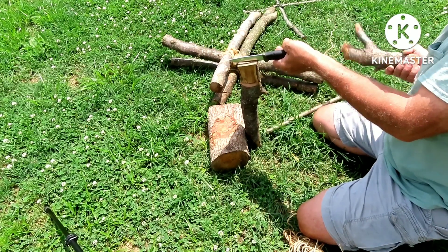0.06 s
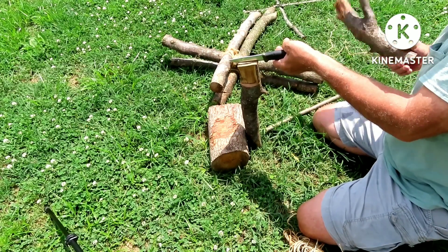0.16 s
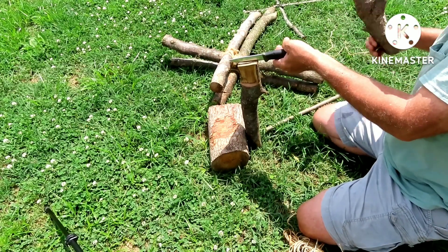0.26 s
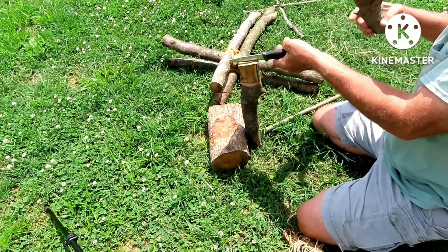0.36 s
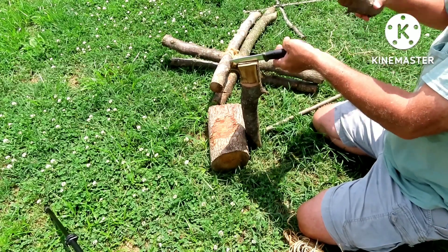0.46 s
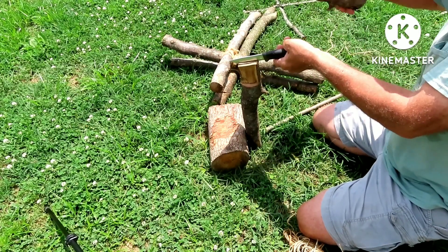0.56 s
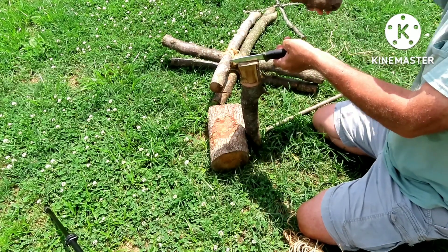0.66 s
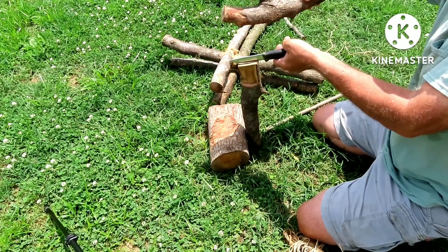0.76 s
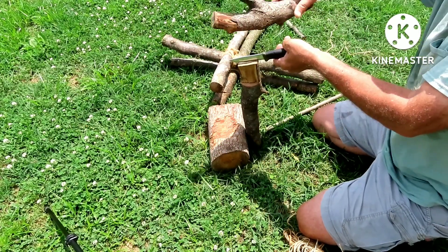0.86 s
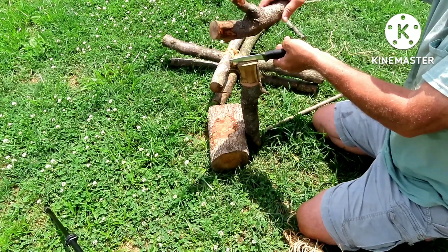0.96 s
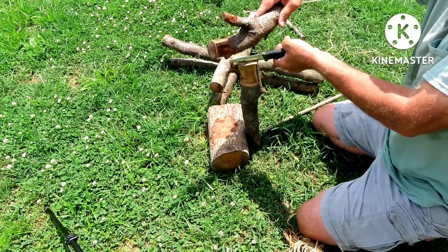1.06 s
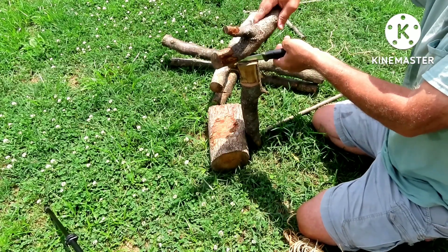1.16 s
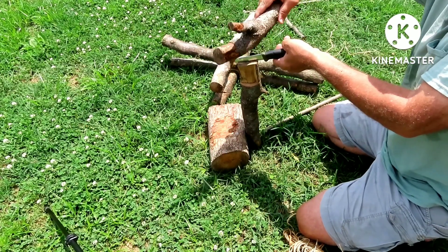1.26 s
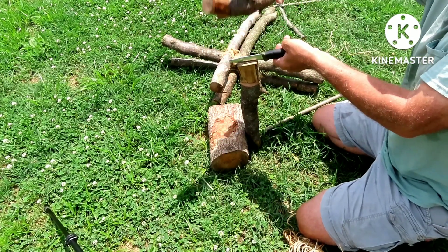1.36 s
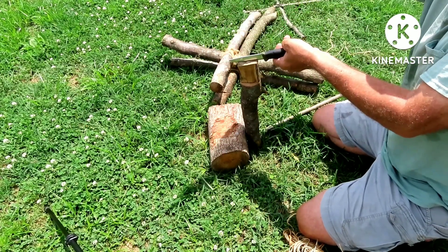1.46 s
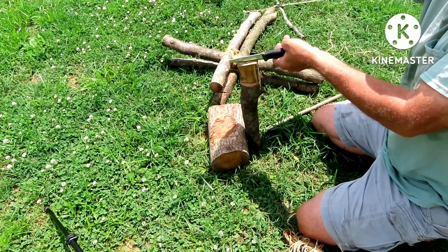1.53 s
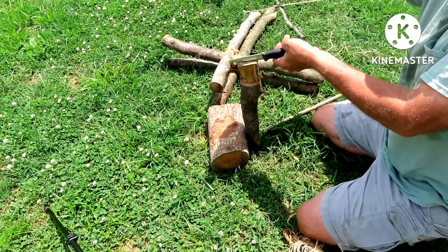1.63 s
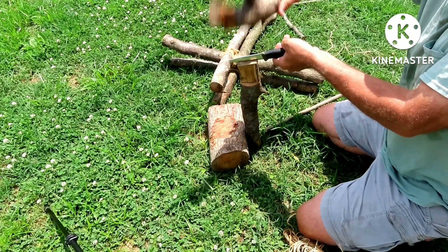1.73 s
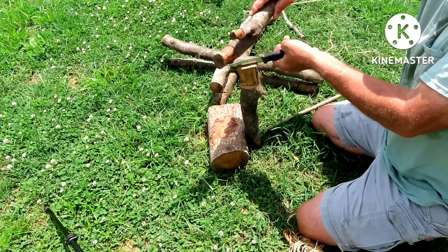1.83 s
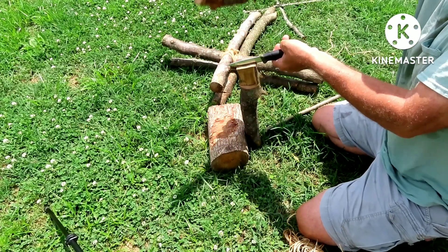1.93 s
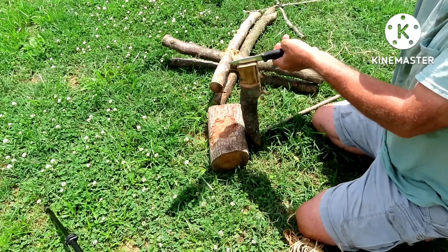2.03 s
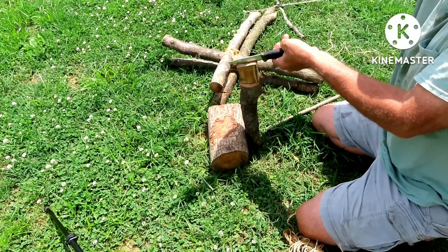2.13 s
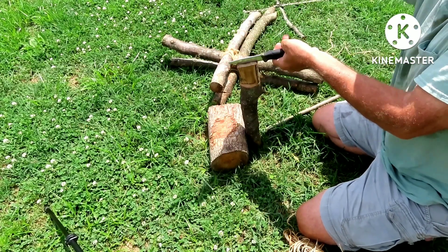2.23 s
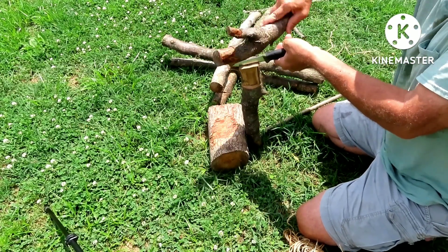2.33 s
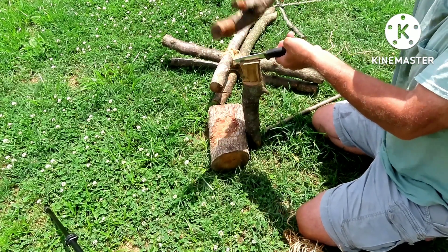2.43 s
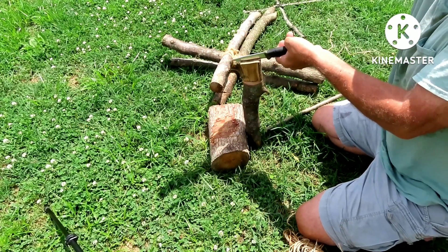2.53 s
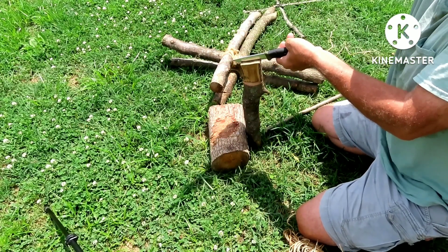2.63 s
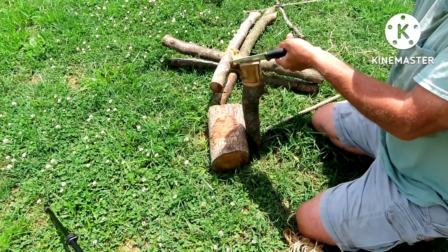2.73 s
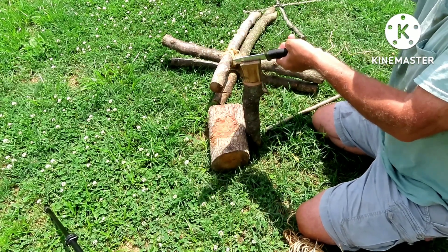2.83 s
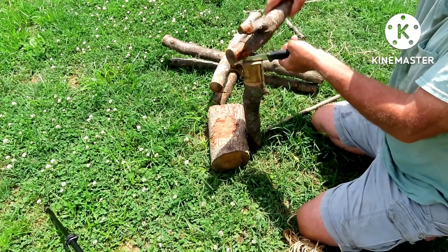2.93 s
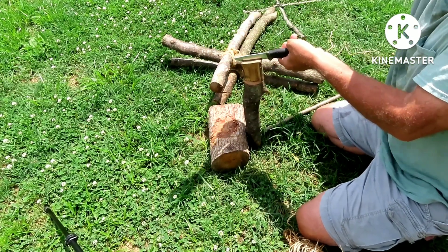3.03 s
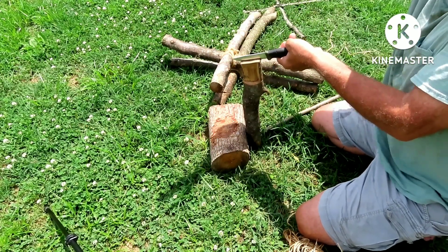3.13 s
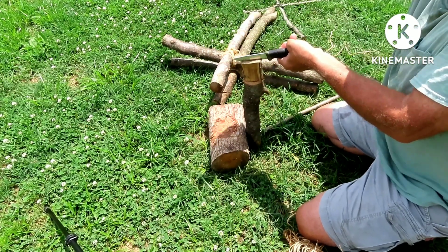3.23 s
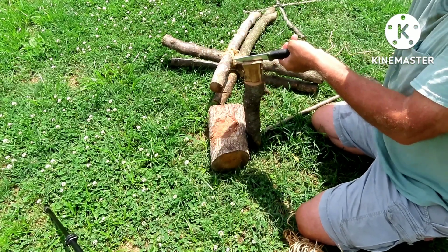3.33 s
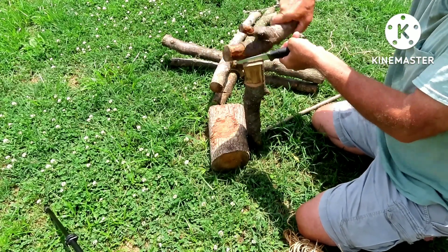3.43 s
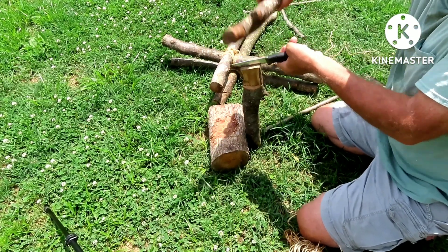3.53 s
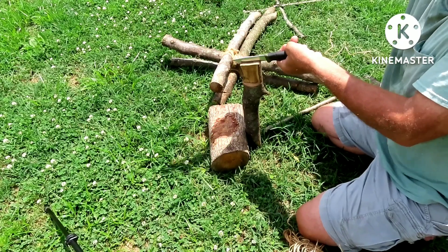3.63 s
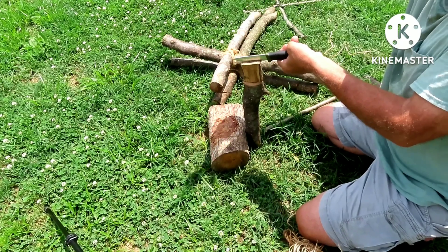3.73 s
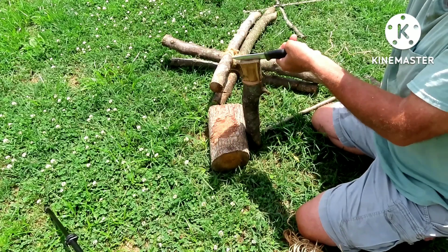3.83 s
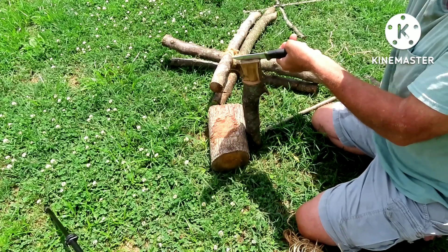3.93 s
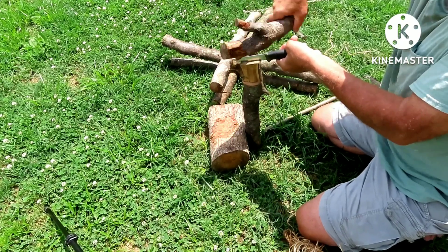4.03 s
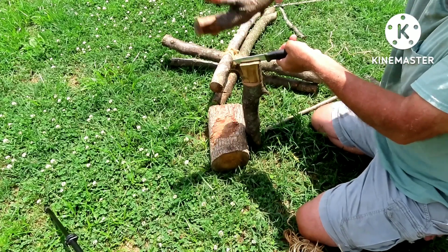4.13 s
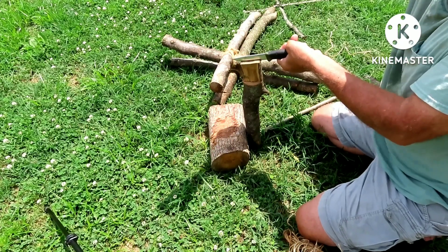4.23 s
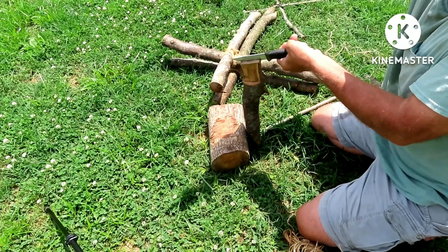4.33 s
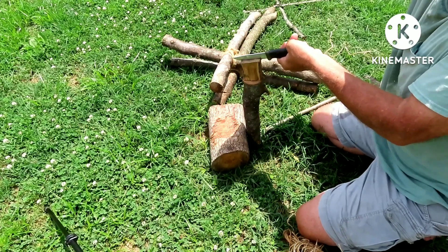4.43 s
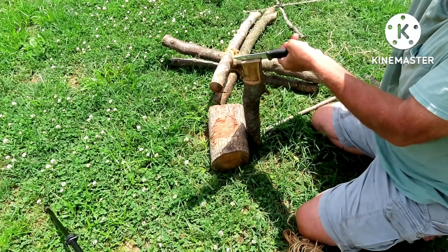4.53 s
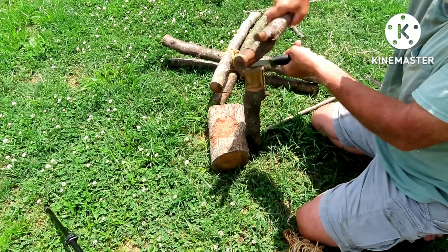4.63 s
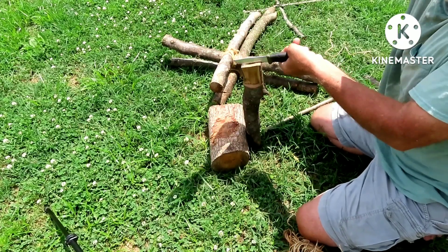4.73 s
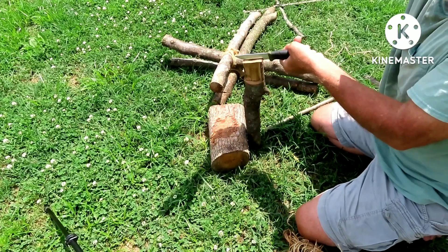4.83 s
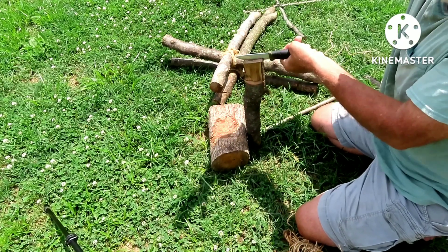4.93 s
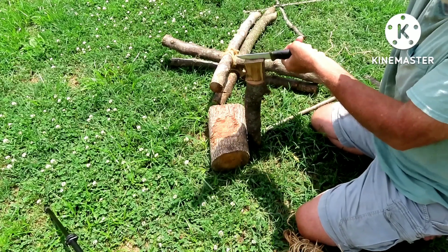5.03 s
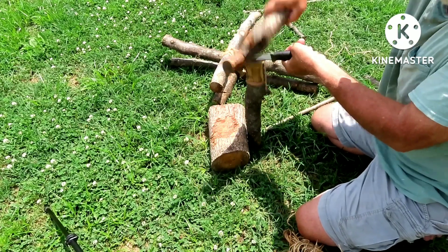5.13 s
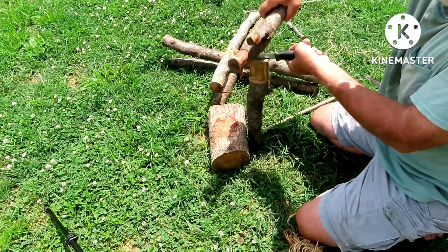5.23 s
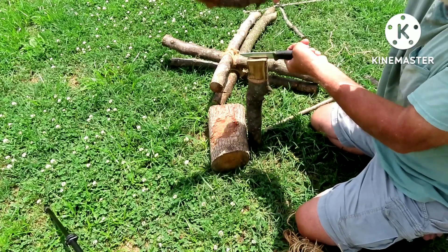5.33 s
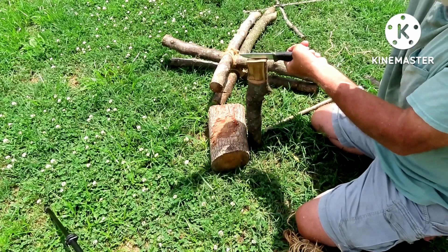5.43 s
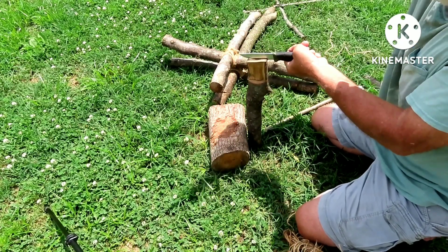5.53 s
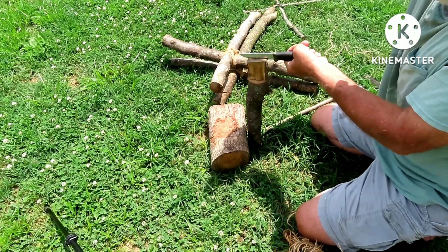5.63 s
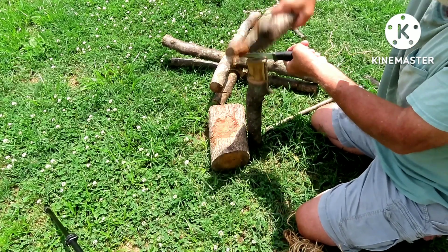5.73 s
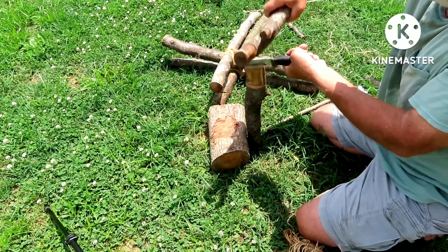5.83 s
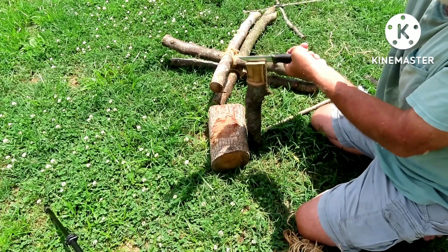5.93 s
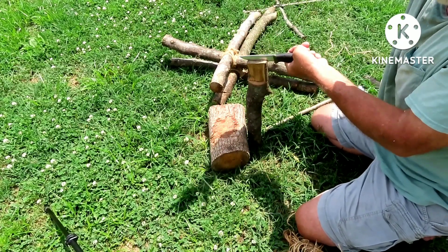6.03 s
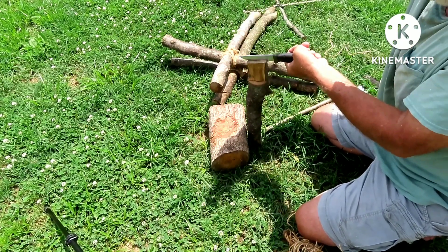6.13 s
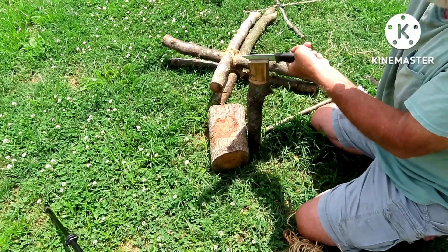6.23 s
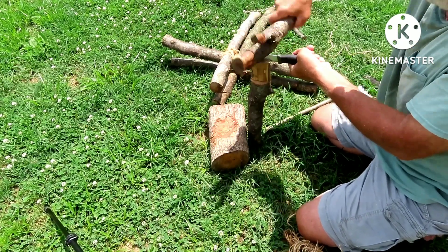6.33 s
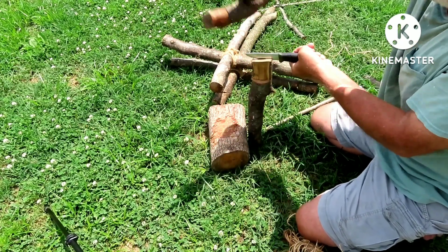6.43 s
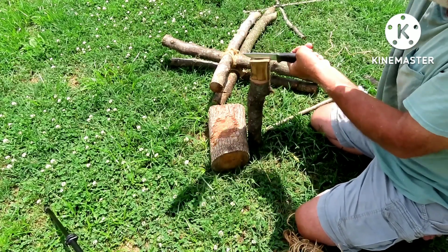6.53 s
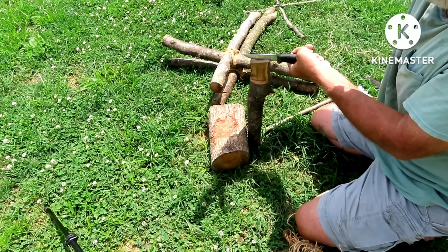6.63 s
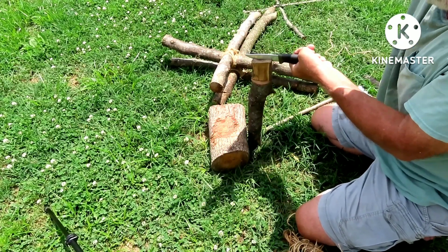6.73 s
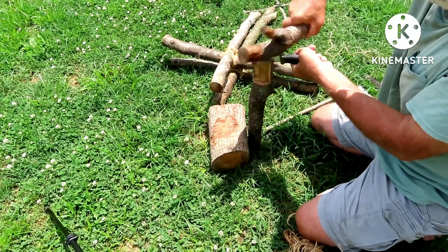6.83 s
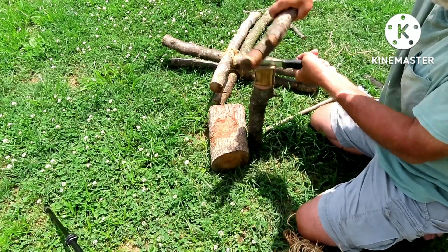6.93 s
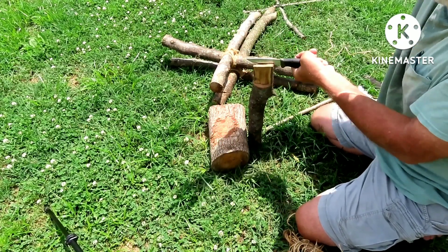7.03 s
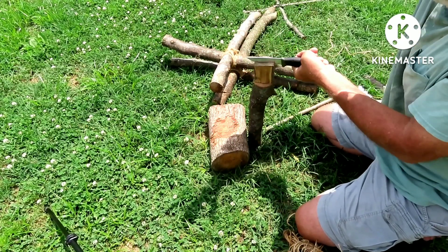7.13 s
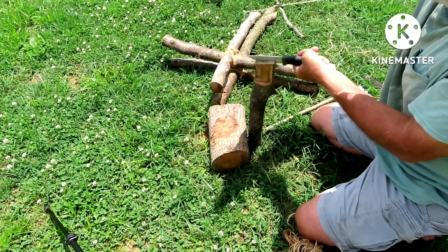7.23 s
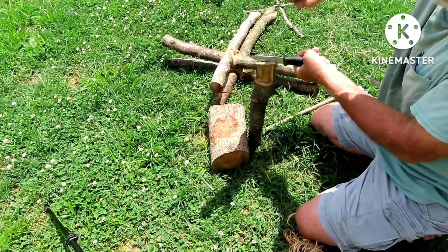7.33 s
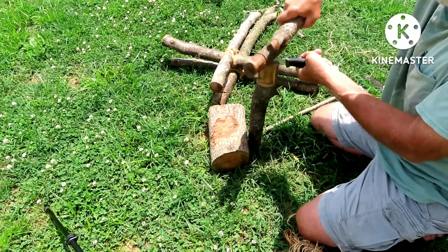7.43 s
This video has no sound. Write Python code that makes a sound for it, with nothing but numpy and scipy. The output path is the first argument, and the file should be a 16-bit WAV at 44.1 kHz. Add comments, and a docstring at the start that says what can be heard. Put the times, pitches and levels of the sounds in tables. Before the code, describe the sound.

A wooden baton knocks ten times on a knife blade set in a log, splitting wood outdoors over a low distant engine drone.

```python
"""On a lawn, a wooden baton knocks ten times on the spine of a knife standing in an upright log.
Each impact excites the damped modes of baton, blade and log; the steel rings, fibres snap, and the
sound is scattered and reflected by trees and walls. The knocks overload the microphone and make
its gain duck. Far engines drone over traffic rumble, a faint high shimmer pulses over the grass,
and hands and clothes rustle."""
import sys
import numpy as np
from scipy import signal
from scipy.fft import rfft, irfft
from scipy.io import wavfile
from scipy.ndimage import uniform_filter1d, minimum_filter1d, map_coordinates

SR = 44100
rng = np.random.default_rng(int(sys.argv[2]) if len(sys.argv) > 2 else 0)


def generate_wav(sig):
    """Save sig (samples, or channels by samples) to the path in sys.argv[1] as 16-bit PCM at SR."""
    pcm = np.round(np.clip(np.atleast_2d(sig).T, -1, 1) * 32767).astype(np.int16)
    wavfile.write(sys.argv[1], SR, pcm)


N = 330309


def from_db(db):
    """Amplitude ratio of a level in decibels."""
    return 10 ** (np.asarray(db) / 20)


def rms_one(x):
    """Normalisation to unit rms."""
    return x / np.sqrt(np.mean(x ** 2) + 1e-20)


def decay(t, t60):
    """Exponential damping: the amplitude falls 60 dB in t60 seconds."""
    return np.exp(-np.log(1000) * t / t60)


def level_at(spectrum, hz):
    """Interpolation of a spectrum (f/Hz, level/dB) on a logarithmic frequency axis."""
    points_hz, db = np.transpose(spectrum)
    return np.interp(np.log(hz), np.log(points_hz), db)


def colour(x, spectrum):
    """Filtering by multiplication with a spectrum (f/Hz, level/dB)."""
    hz = np.maximum(np.fft.rfftfreq(x.shape[-1], 1 / SR), 1)
    return irfft(rfft(x) * from_db(level_at(spectrum, hz)), x.shape[-1])


def band(x, low_hz, high_hz):
    """Band-pass filtering, normalised to unit rms."""
    sos = signal.butter(2, [low_hz, min(high_hz, SR / 2 - 500)], "band", fs=SR, output="sos")
    return rms_one(signal.sosfilt(sos, x))


def drift(rate):
    """Smooth random modulation of unit rms, changing about rate times a second."""
    positions = np.arange(0, N, 32) / SR * rate
    curve = map_coordinates(rng.standard_normal(1024), [positions], order=3, mode="wrap")
    return rms_one(curve).repeat(32)[:N]


def stereo_noise(size, side_db):
    """Partially coherent white noise: a common part plus a side part in antiphase."""
    mid, side = rng.standard_normal((2, size))
    return mid + from_db(side_db) * side * [[1], [-1]]


def add(out, s, sound):
    """Superposition of a stereo sound, starting at s seconds."""
    at = round(s * SR)
    out[:, at:at + sound.shape[1]] += sound[:, :N - at]


# Relative spectral density of outdoor air and far traffic: f/Hz, level/dB
AIR_SPECTRUM = [(20, -32), (35, -8), (55, -0.5), (80, -4), (110, -3.5), (160, -8.5), (210, -10), (300, -15),
                (450, -19.5), (660, -20.5), (850, -19.5), (1400, -22.5), (2800, -34.5), (5000, -45),
                (8000, -51.5), (11000, -61), (15000, -64)]

def air(level_db=-37, flutter_db=0.75):
    """Ambient noise of traffic and leaves; coherence between the channels is greatest in the bass."""
    mid, side = colour(rng.standard_normal((2, N)), AIR_SPECTRUM)
    side = colour(side, [(80, -26.5), (200, -11), (380, -2.5), (700, -12.5), (1300, -12.5),
                         (2400, -7.5), (4400, -4), (8000, -2.5)])
    return from_db(level_db + flutter_db * drift(6)) * (mid + side * [[1], [-1]]) / np.std(mid)


# An engine slowly losing speed: t/s, firing f/Hz, level/dB
SLOWING_ENGINE = [(0, 93, -38), (1.2, 91.5, -41), (2.5, 89, -36), (3.8, 86, -38.5), (4.35, 80, -41),
                  (5.5, 77, -46), (6.7, 76.5, -39), (7.49, 74.5, -36.5)]
# An engine that speeds up and eases off twice: t/s, firing f/Hz, level/dB
REVVING_ENGINE = [(0, 106, -45), (.5, 123, -47), (.9, 125, -37.5), (2.1, 128, -51), (3.5, 111, -53),
                  (3.85, 116, -40), (4.5, 123, -45), (6.6, 129, -36.5), (7.15, 126, -41.5),
                  (7.49, 106, -38.5)]

def engine(rows, overtone_db, waver_hz, waver_db=2.2):
    """Attenuation over distance leaves the firing tone and a weak octave; moving air modulates both."""
    times, *columns = np.transpose(rows)
    hz, db = [np.interp(np.arange(N) / SR, times, column) for column in columns]
    phase = 2 * np.pi * np.cumsum(hz + waver_hz * drift(14)) / SR
    tone = np.sin(phase) + from_db(overtone_db) * np.sin(2 * phase)
    return np.sqrt(2) * from_db(db + waver_db * drift(9)) * tone


def whine(hz=770, width_hz=80, db=-54):
    """Narrow-band noise is heard as a faint, unsteady far whine."""
    return from_db(db) * band(stereo_noise(N, side_db=-9), hz - width_hz / 2, hz + width_hz / 2)


def shimmer(hz, width_hz, db, duty, pulses_per_s=6.7):
    """Amplitude modulation of a narrow high hiss gives uneven pulses, like insects in the grass."""
    cycles = np.cumsum(pulses_per_s * (1 + 0.1907 * drift(12))) / SR
    pulses = uniform_filter1d(1. * (cycles % 1 < duty), SR // 100)
    hiss = band(stereo_noise(N, side_db=4), hz - width_hz / 2, hz + width_hz / 2)
    return from_db(db) * pulses * hiss


# Brushes on bark and grass: peak t/s, level/dB, Gaussian width/s, band f/Hz
BRUSHES = [(0.018, -44, .003, 2000), (.027, -42, 0.007, 700), (0.153, -52, 0.027, 4500),
           (0.127, -61, 0.034, 8000), (.162, -54.5, 0.013, 9000), (0.382, -59, 0.016, 12000),
           (0.919, -54, 0.011, 5000), (0.995, -53, .004, 11000), (1.319, -52, .004, 2500),
           (4.07, -59.5, .07, 5500)]

def rustles(grain_db=3):
    """Friction of hands and clothes makes brief swells of grainy noise."""
    out, t = np.zeros((2, N)), np.arange(N) / SR
    grains = stereo_noise(N, side_db=-2) * from_db(grain_db * drift(280))
    for s, db, width_s, hz in BRUSHES:
        near = abs(t - s) < 4 * width_s
        swell = np.exp(-.5 * ((t[near] - s) / width_s) ** 2)
        out[:, near] += from_db(db) * swell * band(grains[:, near], hz / 2, hz * 1.17)
    return out


# Force spectrum of a full blow: f/Hz, level/dB
BLOW_SPECTRUM = [(250, 8.5), (480, 1.3), (700, 1.5), (950, -.5), (1400, -2.8), (2700, -.6), (6000, 5)]

def excitation(force_db, hardness_db_per_octave, favoured_hz, lift_db, clack_db):
    """Impact spectrum: hardness adds treble, the spot hit favours a resonance, a square hit clacks."""
    hz = np.geomspace(250, 6000, 64)
    bell = lambda centre_hz, octaves: np.exp(-.5 * (np.log2(hz / centre_hz) / octaves) ** 2)
    tilt = hardness_db_per_octave * np.log2(hz / 1400)
    wood = lift_db * bell(favoured_hz, octaves=.3)
    steel = clack_db * bell(3400, octaves=.2)
    return np.transpose([hz, level_at(BLOW_SPECTRUM, hz) + force_db + tilt + wood + steel])


# Normal modes of baton, blade and log together: f/Hz, level/dB, T60/s
MODES = [(269.1, -16.5, 0.025), (491, 10.5, 0.013), (723, -1, 0.018), (812, 3.7, 0.022), (967, -5, 0.013),
         (1106, -16, 0.057), (1311, -2, 0.041), (1391, 2, 0.02), (1773, 4, 0.015), (2063, 2.1, 0.023),
         (2642, 12, 0.0065), (2948, 0.45, 0.015), (3306, 2, 0.01), (4860, -5, 0.0062), (6250, -21, 0.014),
         (9200, -15.5, 0.0042)]

def strike(contact, spread_db=1.5, port_spread_db=.5, build_cycles=1.0, detune=0.0098):
    """Modal superposition: one contact rings all modes, and the light, high ones build up first."""
    t = np.arange(SR // 10) / SR
    hz, mode_db, t60 = np.transpose(MODES)[:, :, None]
    hz = hz * (1 + detune * rng.standard_normal(hz.shape))   # the blade sits differently each time
    db = mode_db + level_at(contact, hz) + spread_db * rng.standard_normal(hz.shape)
    build_up = 1 - np.exp(-hz * t / build_cycles)
    rings = from_db(db) * decay(t, t60) * np.sin(2 * np.pi * hz * t) * build_up
    port_gains = from_db(port_spread_db * rng.standard_normal((2, len(hz))))   # two microphone ports
    return port_gains @ rings


# Baton blows: t/s, force/dB, hardness/(dB/octave), favoured f/Hz, its lift/dB, clack/dB, blade ring/dB
BATON_BLOWS = [(1.9152, -1, 1.5, 2500, 2, -3.5, -1), (2.4788, -1.6, 3, 660, 12, 4.5, 2),
               (3.0349, 1.2, .9, 2050, 3.5, -5, 1.5), (3.5785, -1, -.8, 850, 7, 4.5, -5),
               (4.1634, .8, .6, 1300, 5.5, 4, 4.5), (4.7344, -2.5, -5, 1480, 9, 9, -13),
               (5.3038, -2.6, -.8, 1400, 7, 12.5, 2), (5.9045, -.3, 0, 1450, 3.5, 7, 1.5),
               (6.4493, -3.2, -3.2, 1650, 8, -3, -10), (6.9927, -1.4, -1.3, 1380, 9.5, -1, -5)]
# Light touches and rebounds of the baton: t/s, level/dB
BATON_TAPS = [(0.0175, -32), (1.317, -44), (1.925, -22), (2.488, -26), (3.048, -17), (3.601, -29),
              (4.181, -24), (4.757, -22), (4.7665, -23), (6.477, -24), (7.024, -30)]
# Force spectrum of a soft touch: f/Hz, level/dB
TAP_SPECTRUM = [(250, -3), (480, 8.5), (900, 3.5), (1380, 5), (2000, -6), (3450, -17), (6000, -13)]

def knocks(return_s=0.002341, return_gain=0.42, return_hz=2500):
    """Each impact sends a shock down the log; reflection at its foot returns it inverted and duller."""
    out, t = np.zeros((2, N)), np.arange(N) / SR
    for s, *blow, _ in BATON_BLOWS:
        add(out, s, strike(excitation(*blow)))
    for s, db in BATON_TAPS:
        add(out, s, from_db(db) * strike(TAP_SPECTRUM))
    dull = signal.lfilter(*signal.butter(1, return_hz, fs=SR), out + 1e-18)
    reflected = np.array([np.interp(t - return_s, t, channel) for channel in dull])
    return out - return_gain * reflected


# Reflections from hard walls: delay/s, level/dB
WALL_ECHOES = [(0.0655, -40), (0.112, -48)]

def walls(direct, low_hz=3500):
    """Specular reflection returns the treble of every knock as thin, bright slaps."""
    treble = signal.sosfilt(signal.butter(2, low_hz, "high", fs=SR, output="sos"), direct + 1e-18)
    out = np.zeros((2, N))
    for delay_s, db in WALL_ECHOES:
        add(out, delay_s, from_db(db) * treble)
    return out


# Echoes from the surroundings: delay/s, level/dB, smear/s
GARDEN_ECHOES = [(0.011, -0.5, 0.006), (0.023, -7, 0.0038), (.032, -8, .003), (.052, -13, .0025),
                 (0.067, -12, 0.006), (.113, -18.5, 0.006), (0.228, -20, .014)]
# Spectrum of a knock scattered by grass and trees: f/Hz, level/dB
SCATTER_SPECTRUM = [(120, -14), (480, 6.5), (900, 4), (1300, 7), (1600, 8), (2050, 8), (2500, 3.5),
                    (2950, 2.5), (3300, -4), (4000, -8.5), (6000, -21), (9000, -34), (16000, -52)]

def garden(gain_db=5, near_t60=0.16, far_db=-6, far_t60=0.68, follow=0.57):
    """Multipath scattering smears each blow into a dying wash, with a few echoes standing out."""
    out, t = np.zeros((2, N)), np.arange(SR * 3 // 5) / SR
    unit_energy = lambda power: power / power.sum()
    power = unit_energy(decay(t, near_t60) ** 2)
    power += from_db(far_db) ** 2 * unit_energy(decay(t, far_t60) ** 2)
    for delay, db, smear in GARDEN_ECHOES:
        power += from_db(db) ** 2 * unit_energy(np.exp(-((t - delay) / smear) ** 2))
    for s, *blow, _ in BATON_BLOWS:
        paths = colour(stereo_noise(len(t), side_db=-8), SCATTER_SPECTRUM)
        paths = colour(paths, excitation(*blow) * [1, follow])   # partly follows the blow's spectrum
        add(out, s, from_db(gain_db) * paths * np.sqrt(power))
    return out


def blade(hz=2850, width_hz=300, level_db=-46, t60=0.87, flicker_db=2.5):
    """Free vibration of the steel after each blow, blurred by the surroundings into a noise band."""
    out, t = np.zeros((2, N)), np.arange(SR // 2) / SR
    for s, *_, ring_db in BATON_BLOWS:
        ring = band(stereo_noise(len(t), side_db=-13), hz - width_hz / 2, hz + width_hz / 2)
        add(out, s, from_db(level_db + ring_db) * decay(t, t60) * ring)
    return out * from_db(flicker_db * drift(45))


# Fibres tearing as the blade sinks: t/s, level/dB, T60/s, band f/Hz
FIBRE_TEARS = [(2.501, -45, 0.38, 4970), (3.055, -47.5, .7, 3900), (3.583, -23, 0.17, 1600),
               (3.585, -34.5, 0.34, 4300), (3.76, -56, 1.2, 4340), (4.175, -48.5, 0.6, 6000),
               (5.32, -48, 1, 3120), (5.92, -49, .6, 4500)]

def splitting(snaps_per_s=1100, size_db=4):
    """Fracture of fibres emits random impulses that merge into a dense, dying crunch."""
    out, t = np.zeros((2, N)), np.arange(SR // 2) / SR
    for s, db, t60, hz in FIBRE_TEARS:
        sizes = from_db(size_db * np.minimum(rng.exponential(1, len(t)), 2))
        breaks = rng.random(len(t)) < snaps_per_s / SR
        snaps = breaks * sizes * stereo_noise(len(t), side_db=-9)
        add(out, s, from_db(db) * decay(t, t60) * band(snaps, hz * 0.62, hz * 1.07))
    return out


def scene(port_lag_s=.000011):
    """Superposition of all sources; the knocks reach the right microphone port just before the left."""
    t = np.arange(N) / SR
    left, right = knocks()
    direct = np.array([np.interp(t - port_lag_s, t, left), right])
    drone = (engine(SLOWING_ENGINE, overtone_db=-27, waver_hz=1.6)
             + engine(REVVING_ENGINE, overtone_db=-34, waver_hz=1.0))
    shimmers = (shimmer(hz=10510, width_hz=380, db=-61.3, duty=0.46)
                + shimmer(hz=8990, width_hz=330, db=-66, duty=0.29)
                + shimmer(hz=9800, width_hz=1240, db=-66, duty=0.88))
    impacts = direct + walls(direct) + garden() + blade() + splitting()
    return impacts + drone + whine() + air() + shimmers + rustles()


def gain_control(x, threshold_db=-13, max_duck_db=9, attack_s=.004, hold_s=0.012, release_s=0.075):
    """Dynamic compression: a loud peak pulls the gain down; it holds briefly, then recovers."""
    t, window = np.arange(N) / SR, int(hold_s * SR) // 2 * 2 + 1
    peak_db = 20 * np.log10(abs(x).max(axis=0) + 1e-9)
    excess_db = np.clip(peak_db - threshold_db, 1e-9, max_duck_db)
    held = -minimum_filter1d(-excess_db, window, origin=window // 2)
    # each held peak decays exponentially until a higher one takes over
    released = np.exp(np.maximum.accumulate(np.log(held) + t / release_s) - t / release_s)
    pole = np.exp(-1 / (attack_s * SR))
    duck_db = signal.lfilter([1 - pole], [1, -pole], released)
    return x * from_db(-duck_db)


def record(dry, cutoff_hz=16200):
    """Saturation flattens each blow's first cycles, as the gain ducks too late; a low-pass follows."""
    ducked = gain_control(dry)
    clipped = ducked / (1 + ducked ** 8) ** (1 / 8)
    low_pass = signal.firwin(129, cutoff_hz, fs=SR)
    return signal.fftconvolve(clipped, low_pass[None], "same", axes=1)


dry = scene()
out = record(dry)
generate_wav(out)
```